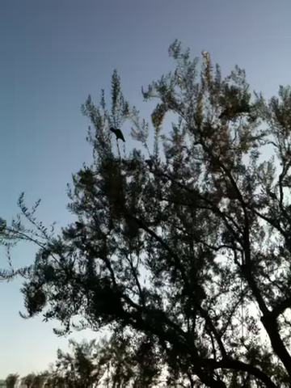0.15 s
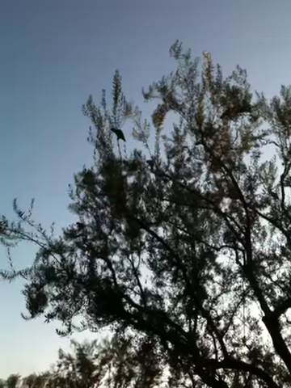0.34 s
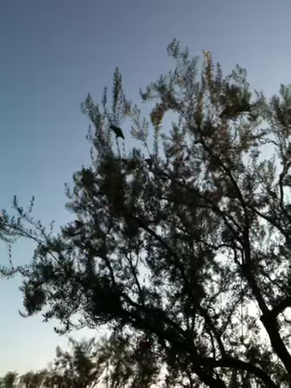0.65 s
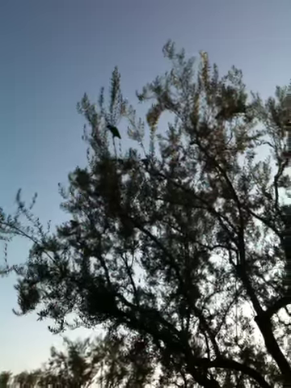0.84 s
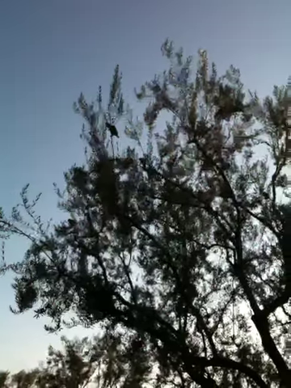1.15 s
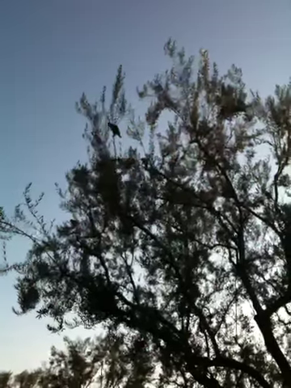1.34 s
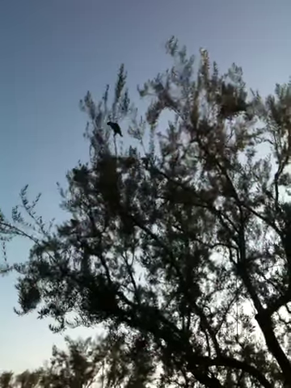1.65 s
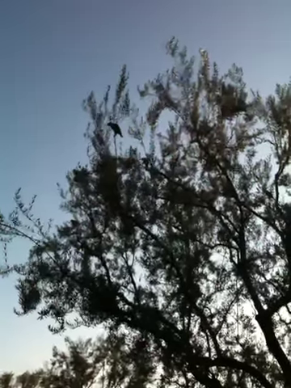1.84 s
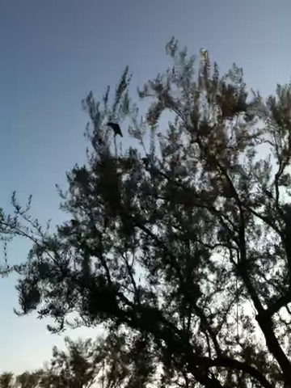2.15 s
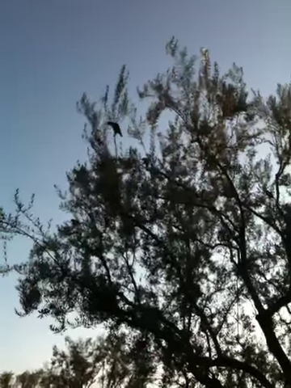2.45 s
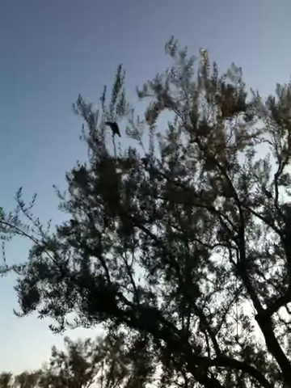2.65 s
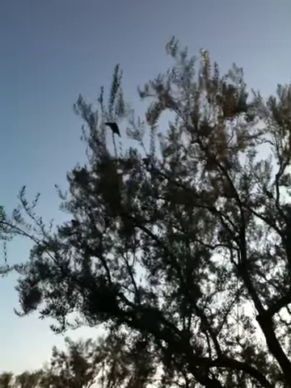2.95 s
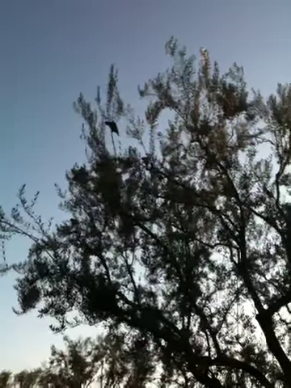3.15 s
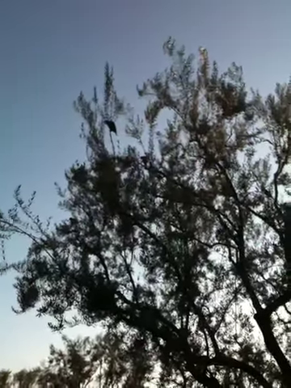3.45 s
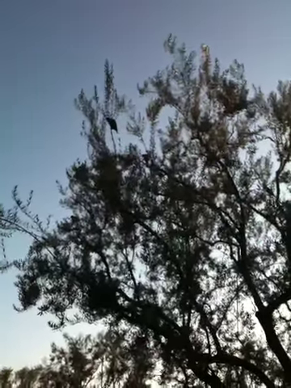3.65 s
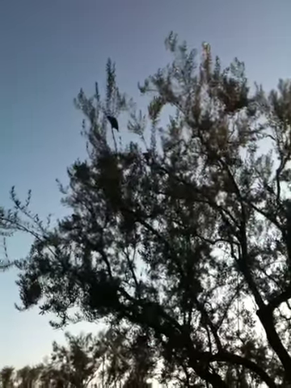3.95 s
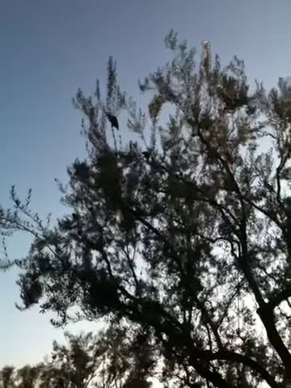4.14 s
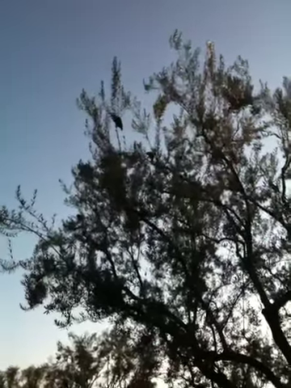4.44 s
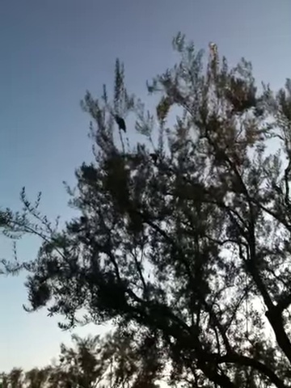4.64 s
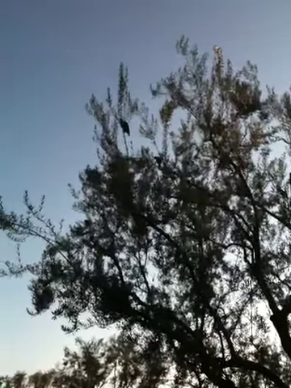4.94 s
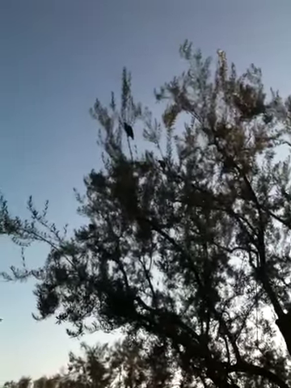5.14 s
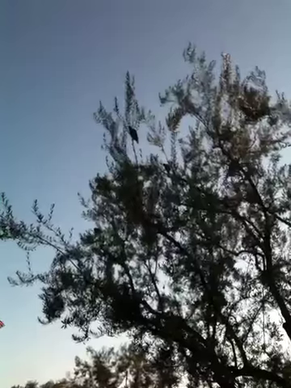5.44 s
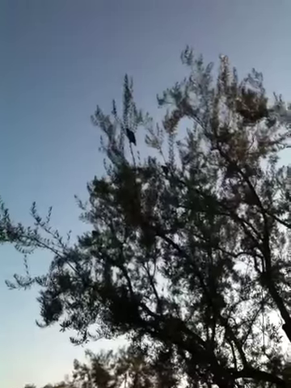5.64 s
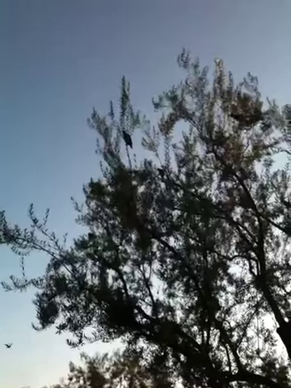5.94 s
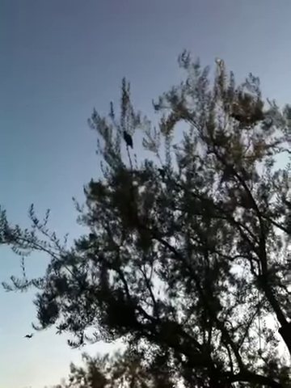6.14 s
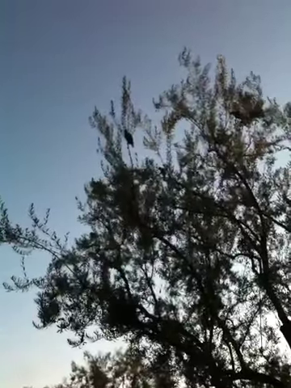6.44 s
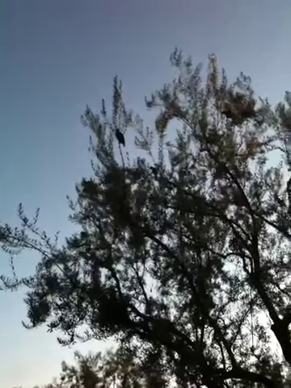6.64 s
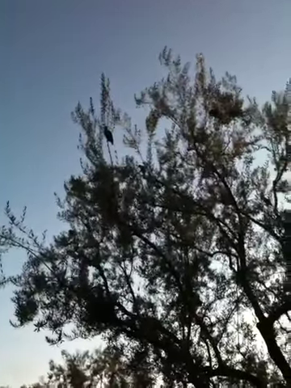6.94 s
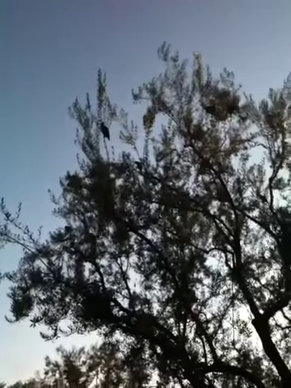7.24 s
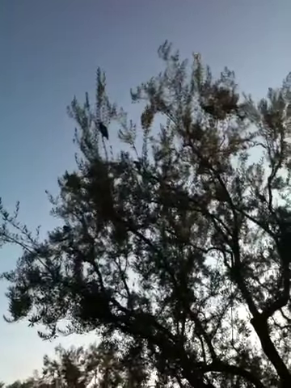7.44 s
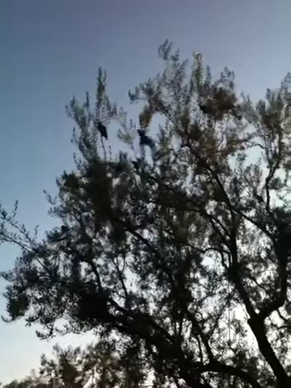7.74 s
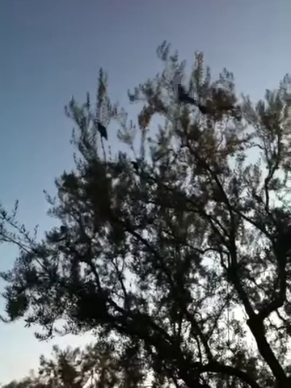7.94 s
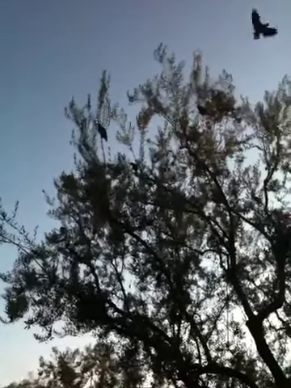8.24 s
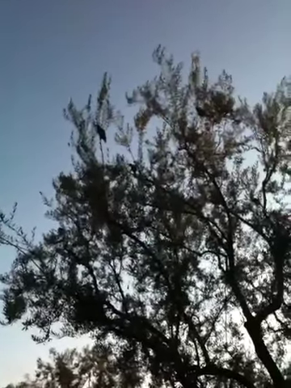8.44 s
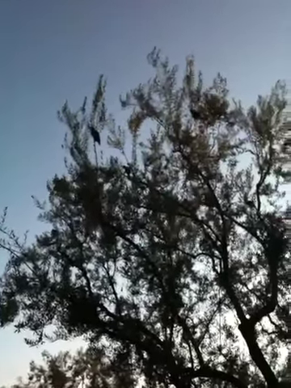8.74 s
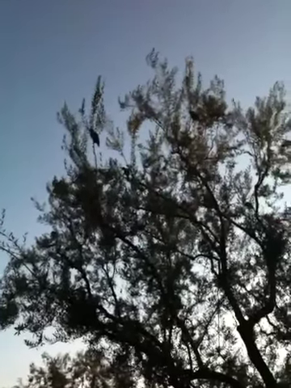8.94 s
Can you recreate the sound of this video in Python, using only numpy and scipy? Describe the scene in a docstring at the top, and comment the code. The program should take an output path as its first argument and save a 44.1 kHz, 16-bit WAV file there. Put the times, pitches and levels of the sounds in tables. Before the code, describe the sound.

After a tiny silence, a raspy descending screech bursts in at 0.1 s with short falling whistles, then a fading squawk to 0.5. Nasal yelps and gritty squawks fill 0.7-1.7, followed by quiet chirps and a sharp broken screech at 2.4-2.6. Soft low thumps and rumble from the hand-held microphone cluster around 2.7-3.3, 3.9-4.2 and 5.4. Squawks lead to fierce screeches at 4.1-4.3 and 4.7-5.0, more squawks at 5.3-5.5, then low caws around 5.6 and 6.1 in a sparse lull. Screeching returns at 6.8-7.0 and builds from 7.3 to the loudest calls at 7.6-8.2, shrill, sliding downward and cracking into low buzzing scoops. A duller rasp at 8.3, faint chirps to 8.8 and a swelling caw with a bump at 9.0 close it. Distant chatter, faint hum and airy foliage echo lie behind.

```python
"""Parrots squabbling in a tree at dusk

A flock whistles close by; a slow oscillator in each voice splits the notes into subharmonics and harsh rasps.
More birds chatter farther off as short falling notes; a nasal one yelps and a lower-voiced one caws.
Weak early copies give the answer of ground and limbs, a scattered noise tail that of the trees.
The hand-held camera's microphone picks up soft, decaying bumps and a rumble over a faint outdoor hum
of coloured noise."""
import sys
import numpy as np
from scipy import signal
from scipy.fft import rfft, irfft, next_fast_len
from scipy.io import wavfile
from scipy.ndimage import uniform_filter1d, map_coordinates

SR = 44100
rng = np.random.default_rng(int(sys.argv[2]) if len(sys.argv) > 2 else 0)


def inscribe(sig):
    """Save sig as 16-bit PCM at rate SR to the path in sys.argv[1].

    A 1-D sig is mono; a 2-D sig holds one channel per row.
    Samples are clipped to [-1, 1] before scaling.
    """
    pcm = np.round(np.clip(np.atleast_2d(sig).T, -1, 1) * 32767)
    wavfile.write(sys.argv[1], SR, pcm.astype(np.int16))


N = 401310
START_S = .061  # silence before the microphone opens
TOP_HZ = 15700  # band limit of the microphone
BLEND_S = .008  # one note melts into the next over this time


def amp(db):
    """Decibels to gain."""
    return 10 ** (np.asarray(db) / 20)


def unit(x):
    """Scale to rms 1."""
    return x / np.sqrt(np.mean(x ** 2) + 1e-20)


def along(points, hz):
    """Read (Hz, value) points on a log frequency axis."""
    f, v = np.transpose(points)
    return np.interp(np.log(hz + 1), np.log(f + 1), v)


def curve(rows):
    """One value per sample from (s, value) rows."""
    return np.interp(np.arange(N) / SR, *np.transpose(rows))


def wobble(rate, t):
    """A smooth random curve at times t, rate knots a second."""
    knots = rng.standard_normal(2 ** 9)
    return map_coordinates(knots, [t * rate], mode="wrap")


def colour(x, gain_db):
    """Filter x by a dB function of frequency."""
    m = next_fast_len(len(x) + 2 ** 10)
    gain = amp(gain_db(np.fft.rfftfreq(m, 1 / SR)))
    return irfft(rfft(x, m) * gain, m)[:len(x)]


def noise(spectrum):
    """Steady coloured noise of rms 1."""
    return unit(colour(rng.standard_normal(N), lambda hz: along(spectrum, hz)))


def add(track, s, sound):
    """Mix a sound in at s seconds."""
    i = int(np.clip(round(s * SR), 0, N))
    track[i:i + len(sound)] += sound[:N - i]


def clock(length_s):
    """Time (s) and progress (0-1) through a call."""
    t = np.arange(int((max(length_s, 2 * BLEND_S) + BLEND_S) * SR)) / SR
    return t, t / t[-1]


# Strength of the sidebands when the slow oscillator runs at 1/1 to 1/4 of the pitch: level_db
SIDEBAND_DB = [0, -5.5, -8.5, -11.5]


def syrinx_tone(pitch, slow, rasp, division, centre_hz, throat, top_db, t,
                sub_rasp_db=6, overtone_db=-5.0, pure_db=-8, whistle_db=4.0, whistle_loss_db=3,
                undertone_db=-4, undertone_push=0.049, undertone_per_octave_db=8):
    """Whistle harmonics with sidebands set off by the slow oscillator; energy hops between the partials."""
    phase = 2 * np.pi * np.cumsum(pitch) / SR
    # each partial is a harmonic of the whistle or one of its sidebands
    k = np.arange(1, 6 * division + 1)[:, None]
    harmonic = np.maximum(1, (k + division // 2) // division)
    side = k - harmonic * division
    partial_hz = k / division * centre_hz
    offset = rng.uniform(0, 2 * np.pi, 2 ** 6)[:len(k), None]
    partials = np.sin((harmonic * phase + side * slow + offset).astype(np.float32))

    # below this rasp the sidebands fade and the whistle is pure
    pure_rasp = 0.18
    split = np.minimum(1, rasp / pure_rasp)
    sideband_gain = split * amp(SIDEBAND_DB[division - 1] + sub_rasp_db * rasp)
    sidebands = np.where(side, sideband_gain, 1)
    overtones = amp(overtone_db * np.clip(k / division - 1, 0, 1))
    overtones = overtones * np.where(harmonic > 1, amp(pure_db * (1 - split)), 1)

    # shrill notes lean harder on their undertones
    shrill_db = undertone_per_octave_db * np.log2(centre_hz / 2500)
    undertones_db = undertone_db + undertone_push * top_db + shrill_db
    first_db = whistle_db - whistle_loss_db * rasp
    overtones = overtones * amp(first_db * (k == division) + undertones_db * (k < division))

    # quick hops for all partials, slower shifts for all but the whistle itself
    knots = np.arange(2 ** 6) / 170
    hop_db = (1 + 3 * np.interp(knots, t, rasp)) * rng.standard_normal((len(k), len(knots)))
    shift_db = 2.5 * np.array([wobble(40, knots) for _ in k])
    hop_db = hop_db + shift_db * (k != division)
    hops = [np.interp(t, knots, gain) for gain in amp(hop_db)]
    strength = sidebands * overtones * (partial_hz < TOP_HZ) * hops

    # the total that leaves the throat stays even
    radiated = strength * amp(along(throat, partial_hz))
    return np.sum(strength * partials, axis=0) / np.linalg.norm(radiated, axis=0)


def patchy(x, depth_db):
    """Chaos gathers in brief patches, a few hundred hertz wide."""
    z = signal.stft(x, nperseg=256)[2]
    field = uniform_filter1d(rng.standard_normal(z.shape), 3, 0)
    field = uniform_filter1d(field, 3, 1)
    return signal.istft(z * amp(depth_db * unit(field)), nperseg=256)[1][:len(x)]


def note(t, pitch, rasp, division, bright_db, throat, top_db=0,
         jitter=0.0367, jitter_rate=900, flutter_db=1.1, looseness=0.1592,
         turbulence_db=2.2, focus_db=3, focus_octaves=0.44, warble_hiss_db=-3.0):
    """One note of the syrinx: a whistle, modulated by a slower oscillator, that turns chaotic as rasp grows."""
    rasp = np.clip(rasp, 0, 1)
    centre_hz = pitch.mean()
    # tense notes waver; undivided ones warble hardest
    waver_depth = .004 + .032 * rasp + .06 * rasp ** 2 * (division == 1)
    waver = waver_depth * wobble(190, t)
    pitch = pitch * (1 + waver + jitter * rasp * wobble(jitter_rate, t))
    # the slow oscillator only loosely holds its fraction of the pitch
    slip = looseness * rasp * wobble(110, t)
    slow = 2 * np.pi * np.cumsum(pitch / division * (1 + slip)) / SR
    tone = syrinx_tone(pitch, slow, rasp, division, centre_hz, throat, top_db, t)

    # turbulence puffs once in every slow cycle
    hiss = np.resize(rng.standard_normal(2 ** 14), len(t))
    puffs = patchy(hiss, 4) * (1 + .7 * np.cos(slow))

    def beak(hz):
        treble_db = bright_db * along([(3000, 0), (7000, 1)], hz)
        top_octave_db = top_db * along([(8000, 0.031), (13000, 1.0)], hz)
        return along(throat, hz) + treble_db + top_octave_db

    def airy(hz):  # the hiss gathers round the whistle
        octaves = np.log2((hz + 1) / centre_hz)
        return beak(hz) + focus_db * np.exp(-(octaves / focus_octaves) ** 2)

    hoarse = amp(turbulence_db + warble_hiss_db * (division == 1)) * rasp ** 2
    voice = unit(colour(tone, beak)) + hoarse * unit(colour(puffs, airy))
    voice = voice / np.hypot(1, hoarse)
    gate = np.sin(np.pi / 2 * np.clip(np.minimum(t, t[-1] - t) / BLEND_S, 0, 1))
    flutter = unit(amp(flutter_db * (0.98 + rasp) * wobble(137.4, t)))
    return voice * gate * flutter


# Spectrum of the outdoor hum at the microphone: freq_hz, level_db
AIR_SPECTRUM = [(15, -82), (25, -78), (59, -19), (221, -1.5), (281, -7.5), (349, -9.5), (741, -10),
                (997, -10), (1530, -12), (2360, -29), (2770, -28), (3090, -27), (4040, -35), (4380, -25),
                (15500, -40.5)]


def evening_air():
    """A faint, low-heavy hum of coloured noise whose level drifts slowly."""
    drift_db = wobble(1.703, np.arange(N) / SR)
    return noise(AIR_SPECTRUM) * amp(-55.0 + drift_db)


# How long the trees ring in each band: freq_hz, t60_s
GROVE_DECAY = [(300, 0.28), (2500, 0.66), (6000, 0.96), (14000, 0.63)]


def grove(x, scatter_rate=420):
    """Diffuse answer of the trees: foliage smears the pitch, and each band dies at its own speed."""
    hz, t, z = signal.stft(rng.standard_normal(SR), SR, nperseg=256)
    decay = amp(-60 * t / along(GROVE_DECAY, hz)[:, None])
    tail = signal.istft(z * decay, SR, nperseg=256)[1]
    scattered = x * unit(wobble(scatter_rate, np.arange(N) / SR))
    delayed = np.pad(tail, (SR // 80, 0)) / np.linalg.norm(tail)
    return signal.fftconvolve(scattered, delayed)[:N]


# Chatter from the far birds, before a 3 dB cut: time_s, level_db
FLOCK_LEVEL = [(0, -36), (.45, -44), (.6, -54.5), (.9, -43.5), (1.3, -49.5), (1.7, -49.5), (2.1, -57),
               (2.7, -52), (3.1, -54), (3.9, -49), (4.35, -45), (5.05, -44.5), (5.2, -55), (5.6, -55),
               (5.9, -63.5), (6.3, -53), (6.6, -60), (7.4, -47.5), (8.4, -61), (8.85, -63.5), (9.1, -46.5)]
# Throat resonance shared by the far birds and most of the near ones: freq_hz, gain_db
THROAT_SPECTRUM = [(400, -22), (800, -11.5), (1300, -2.5), (1800, 1.5), (2400, -0.5), (3200, 2), (4400, -1),
                   (5600, -5.5), (7500, -6.5), (9000, -15.5), (10500, -23), (15500, -38.5)]
# Colour that the distance gives the far birds: freq_hz, gain_db
DISTANCE_SPECTRUM = [(600, 9.5), (2000, -2.5), (5000, -1), (9000, 1.5), (15000, -5)]


def far_flock(count=190):
    """Many distant birds with short, hoarse, falling notes, dulled by the air."""
    out = np.zeros(N)
    for i, draws in enumerate(rng.random((count, 8))):
        when, length, pitch, fall, bend, kind, rasp, size = draws
        t, u = clock(.03 + .05 * length)
        arc = 1 + .25 * (bend - .5) * np.sin(np.pi * u)
        hz = (2000 + 1300 * pitch) * (1 - .28 * fall * u) * arc
        hoarse = np.full(len(t), .25 + .55 * rasp)
        sound = note(t, hz, hoarse, 2 + int(2 * kind), 0, THROAT_SPECTRUM)
        add(out, (i + when) / count * N / SR, amp(7.3 * size) * sound)
    out = out + amp(0.3) * grove(out)
    out = colour(out, lambda hz: along(DISTANCE_SPECTRUM, hz))
    return unit(out) * amp(curve(FLOCK_LEVEL) - 3.0)


# Rumble of the grip on the camera, before a 0.5 dB cut and random unsteadiness: time_s, level_db
GRIP_LEVEL = [(0.2, -60), (0.25, -64.5), (0.62, -58.5), (2.65, -54), (2.88, -39.5), (3.12, -45), (3.3, -50),
              (3.57, -52.5), (3.82, -50), (4.04, -44.5), (4.19, -52.5), (4.64, -51.5), (4.98, -49.5),
              (5.28, -52), (5.38, -40), (5.6, -57), (6.35, -58), (8.03, -53), (8.43, -48.5), (8.55, -50),
              (8.78, -53.5), (9.1, -45)]


def slips(count=200, scatter_db=8):
    """Small bumps at random, stronger while the grip rumbles: rows (s, peak dB, pitch Hz)."""
    firm_grip_db, slip_db = -47.5, -39.5  # rumble level from which slips peak, on average, at slip_db
    fade_ratio = 2.22  # slips fade faster than the rumble
    when, size, pitch = rng.random((count, 3)).T
    s = (np.arange(count) + when) / count * N / SR
    calm_db = np.minimum(0, np.interp(s, *np.transpose(GRIP_LEVEL)) - firm_grip_db)
    peak_db = slip_db + fade_ratio * calm_db + scatter_db * (size - .5)
    return list(zip(s, peak_db, 160 + 80 * pitch))


# The firmest handling bumps, before the casing colours them: start_s, peak_db, pitch_hz
FIRM_BUMPS = [(2.033, -32, 209), (2.713, -25, 185), (2.758, -32.5, 164), (2.861, -23.5, 307),
              (2.886, -24.5, 215), (2.98, -29, 228), (3.053, -31, 197), (3.071, -30, 184),
              (3.107, -32, 172), (3.235, -34, 258), (3.272, -33.5, 163), (3.312, -34, 149),
              (3.504, -34.5, 179), (3.857, -39, 213), (3.901, -30.5, 195), (3.922, -33, 227),
              (3.942, -33.5, 183), (4.1, -29.5, 236), (4.116, -29, 210), (4.132, -29, 220),
              (4.152, -33, 178), (4.391, -33.5, 230), (4.547, -31.5, 228), (4.634, -35.5, 230),
              (4.731, -35.5, 174), (4.86, -29.5, 184), (5.194, -32, 253), (5.243, -33, 199),
              (5.259, -37, 257), (5.276, -31, 198), (5.305, -31.5, 232), (5.348, -34, 265),
              (5.362, -25, 194), (5.374, -30, 275), (5.384, -34, 230), (5.397, -28, 200),
              (5.434, -28.5, 220), (7.811, -37.5, 202), (8.192, -34.5, 221), (8.347, -37.5, 192),
              (8.569, -33.5, 181), (9.07, -24.5, 250), (9.083, -28.5, 267)]
# Spectrum of the grip's rumble in the microphone: freq_hz, level_db
RUMBLE_SPECTRUM = [(18, -71), (30, -78), (94, -1), (156, 5), (200, 1), (328, -5), (408, -13), (501, -14),
                   (800, -22.5), (1040, -83), (1760, -120)]


def handling(rise_s=0.0019):
    """Each shift of the grip gives the casing a dull push of two or three cycles, over a rumble."""
    out, t = np.zeros(N), np.arange(SR // 16) / SR
    shape = (t / (2 * rise_s)) ** 2 * np.exp(2 - t / rise_s)
    bumps = list(FIRM_BUMPS) + slips()
    for (s, db, hz), turn in zip(bumps, rng.random(len(bumps))):
        push = shape * np.sin(2 * np.pi * (hz * t + turn))
        add(out, s - 2 * rise_s, amp(db) * push)
    casing = [(30, -28), (70, 0.0), (130, 9.5), (280, 3.0),
              (420, 11.5), (800, 18.0), (1600, -20), (4000, -50)]  # (Hz, dB)
    unsteady_db = 2.5 * wobble(25, np.arange(N) / SR)
    rumble = noise(RUMBLE_SPECTRUM) * amp(curve(GRIP_LEVEL) - 0.5 + unsteady_db)
    return colour(out, lambda hz: along(casing, hz)) + rumble


def sweeps(t, depth, sweep_s=0.025):
    """Pitch factor of a run of quick downward sweeps that deepen towards the end of a call."""
    left = t[-1] - t - BLEND_S / 2
    sawtooth = np.maximum(left, 0) / sweep_s % 1 - .5
    return 1 + depth * (t / t[-1]) ** 2 * sawtooth


def top_octave(db, ordinary_db=-39, nearness=0.69):
    """Loud, near birds keep more of their top octave (dB)."""
    return nearness * (db - ordinary_db)


def voiced(t, pitch, rasp, division, bright_db, opening_db, throat, db):
    """One call: its effort surges at random, and the opening beak changes the treble."""
    surge_rate = 36  # knots per second
    surge_db, surge_rasp, surge_pitch = 0.57, 0.099, 0.01957  # level; shares of rasp and pitch
    surge = wobble(surge_rate, t)
    pitch = pitch * (1 + surge_pitch * rasp * wobble(surge_rate, t))
    rasp = rasp * (1 - surge_rasp * surge)
    sound = note(t, pitch, rasp, division, bright_db, throat, top_octave(db))
    treble_band = [(2500, -35), (4000, -4.0), (6000, -4), (8500, -1.5), (12000, -3)]  # (Hz, dB)
    treble = colour(sound, lambda hz: along(treble_band, hz))
    opened = sound + treble * (amp(opening_db * (t / t[-1] - .5)) - 1)
    return opened * unit(amp(surge_db * surge))


def with_beak(resonances, width_octaves=0.17):
    """The throat spectrum plus the peaks and dips of one bird's open beak: (Hz, dB)."""
    hz = np.geomspace(400, 15500, 2 ** 7)
    beak_db = sum(db * np.exp(-(np.log2(hz / centre_hz) / width_octaves) ** 2) for centre_hz, db in resonances)
    return np.column_stack([hz, along(THROAT_SPECTRUM, hz) + beak_db])


# Long screeches close to the microphone: division (of the pitch), sweep_depth (share of pitch), bright_db,
# opening_db (treble control from start to end), beak (rows of freq_hz, gain_db),
# course (rows of time_s, pitch_hz, rasp 0-1, level_db before the mix)
SCREECH_CALLS = [ (3, 0.1, 2, -5, [(1600, 3.5), (2250, 2.5), (2900, -2), (5500, -4.5)],
                 [(.055, 2380, 0.64, -41), (.12, 2340, 0.59, -35), (.16, 2359, 0.42, -33.5),
                 (.2, 2250, 0.72, -37), (.245, 2104, .55, -41.5), (.31, 1970, 0.9, -44)]),
                 (2, 0.036, 6.5, 4, [(1900, 4), (4100, 2.5), (5500, -3)], [(2.368, 2498, 0.52, -60),
                 (2.384, 2554, .7, -47), (2.392, 2290, 1, -44), (2.405, 2797, 0.4, -39),
                 (2.414, 2826, 0.63, -35), (2.422, 2490, 0.94, -43.5), (2.437, 2596, 0.6, -38.5),
                 (2.452, 2530, 0.9, -41), (2.463, 2400, .85, -38.5), (2.478, 2110, 1, -44),
                 (2.495, 2200, 0.6, -45), (2.506, 2200, .7, -51)]), (2, 0, 7, 9, [(1400, -3), (4100, 2),
                 (5300, -3), (6700, 2)], [(2.506, 2150, .8, -51), (2.52, 2350, 0.9, -37.5),
                 (2.535, 3205, 0.77, -42), (2.551, 2740, 0.38, -34), (2.565, 3020, 0.63, -41),
                 (2.576, 2550, 0.45, -34), (2.59, 2475, .45, -48.5), (2.615, 2560, .7, -59)]),
                 (2, 0.0082, 1.5, 4, [(2100, 0), (3700, 2.5), (5800, -2.5), (7600, 3.5)],
                 [(4.06, 2725, 0.65, -44), (4.08, 2760, 0.5, -42), (4.091, 2707, 0.08, -29),
                 (4.102, 2980, 0.7, -36), (4.12, 3225, 1, -32), (4.14, 3034, .95, -36),
                 (4.158, 3780, 0.83, -35), (4.167, 2610, 0.44, -32.5), (4.175, 2540, 0, -30.5),
                 (4.186, 2520, 0.83, -37), (4.198, 2350, 0.43, -36), (4.218, 2560, 0.5, -34)]),
                 (4, 0, 3.5, 9, [(1650, 2.5), (3800, -0.5), (5400, -6.5), (7300, 5)],
                 [(4.215, 2380, 0.8, -31.5), (4.233, 2490, 0.8, -30.5), (4.245, 3400, .75, -31.5),
                 (4.262, 2960, 0.22, -31), (4.272, 3095, 0.78, -36), (4.281, 2870, 0.43, -30.5),
                 (4.289, 2520, .4, -32), (4.302, 2520, .7, -47)]), (2, 0.33, 4.5, 35, [(2300, 0.5),
                 (3700, 4), (4700, 5)], [(4.66, 2298, .8, -48.5), (4.74, 2460, .85, -34.5),
                 (4.79, 2746, 0.88, -33.5), (4.845, 3100, 0.7, -33), (4.87, 2870, 0.28, -31.5),
                 (4.925, 2596, .55, -40.5), (4.95, 2806, .25, -42), (4.975, 2620, 0.24, -38.5),
                 (4.995, 2273, .6, -72)]), (2, 0.044, 2, -5, [(1400, -10), (4500, 5.5), (6300, -3)],
                 [(6.757, 2530, 0.76, -46), (6.769, 2790, .55, -36.5), (6.785, 2527, .36, -41),
                 (6.798, 2483, .6, -42), (6.81, 2674, 0.72, -41), (6.82, 2447, 0.7, -40),
                 (6.835, 2690, 0.87, -38.5), (6.853, 2420, 0.8, -35.5), (6.868, 2760, 0.6, -42),
                 (6.882, 2360, .8, -45), (6.892, 2560, 0.65, -36), (6.903, 2470, 0.44, -36),
                 (6.918, 2520, 0.04, -36), (6.932, 2420, 0.4, -47)]), (3, 0, 3, 1, [(800, 8.5), (1650, -5),
                 (3600, 3), (4700, 2.5), (8200, 7)], [(6.938, 2380, .4, -44), (6.951, 2485, .48, -29.5),
                 (6.968, 2340, 0.77, -34.5), (6.982, 2410, 0.6, -38), (6.995, 2334, 0.73, -35),
                 (7.005, 2372, .4, -28), (7.024, 2397, 0.08, -26), (7.033, 2370, .35, -38),
                 (7.042, 2400, .5, -53)]), (2, 0, 4, 4.5, [(1600, -8), (2300, 2), (3700, 0), (4700, 6),
                 (7100, 2)], [(7.28, 2670, .8, -54), (7.365, 2767, 0.92, -36.5), (7.42, 2754, .9, -31.5),
                 (7.46, 2610, 0.83, -33.5), (7.482, 2950, 0.47, -33.5), (7.505, 2780, 0.52, -30.5),
                 (7.525, 2743, 0.16, -30), (7.545, 2566, 0.57, -29), (7.563, 2540, 0.7, -48.5)]),
                 (3, 0.013, 2.5, -5, [(1500, 3), (3900, 6), (5900, 2.5)], [(7.577, 2484, 0.68, -38),
                 (7.597, 2250, 0.69, -31.5), (7.635, 2258, 0.82, -36), (7.65, 2413, 0.51, -27),
                 (7.705, 2370, 0.02, -21.5), (7.72, 2360, 0.26, -31), (7.74, 2340, .5, -31),
                 (7.765, 2197, 0.01, -26.5), (7.795, 2145, 0.35, -31), (7.824, 2034, 0, -30),
                 (7.833, 2054, .15, -34.5), (7.846, 2000, 0, -28), (7.866, 1970, .05, -54)]),
                 (2, 0.039, -1.5, -5, [(1250, 1.5), (1650, -11), (2500, -1), (5100, 7)],
                 [(7.895, 2650, 0.43, -45), (7.904, 2684, 0.6, -39), (7.915, 2683, .7, -37.5),
                 (7.94, 2720, 0.67, -32.5), (7.965, 2640, 0.55, -31), (7.985, 2620, .7, -42)]),
                 (3, 0.029, 2.5, -4, [(1350, 5.5), (1700, -4), (3000, -4), (4500, 4.5), (6600, -11),
                 (8800, 2.5)], [(7.962, 2388, .5, -33), (8, 2068, .6, -30), (8.028, 2170, 0.5, -31.5),
                 (8.047, 2067, 0.32, -26.5), (8.073, 2303, 0.6, -27), (8.09, 2218, 0.48, -29),
                 (8.115, 2197, 0.43, -30), (8.135, 2020, 0.8, -33), (8.16, 1930, 0.41, -33.5),
                 (8.195, 1915, 1, -37.5), (8.212, 1800, 0.2, -46), (8.235, 1733, 0.36, -51)]),
                 (4, .05, -9.5, -10, [(1200, 7), (1800, -1.5), (2900, -8), (3800, 0.5), (5400, 4),
                 (7300, -6)], [(8.266, 1797, 0.46, -58.5), (8.295, 1858, .75, -34.5),
                 (8.315, 1924, .72, -35), (8.355, 1902, .68, -35.5), (8.37, 1754, 0.6, -52),
                 (8.385, 1760, .4, -59)])]


def screeches():
    """Long calls of the nearest birds; during a break the whistle weakens and its rasp is drawn to one value."""
    break_rasp, break_duck_db = 0.62, -6  # reached in the middle of a break
    out = np.zeros(N)
    for division, depth, bright_db, opening_db, beak, course in SCREECH_CALLS:
        s, *controls = np.transpose(course)
        t, _ = clock(s[-1] - s[0])
        now = s[0] - BLEND_S / 2 + t
        pitch, rasp, db = [np.interp(now, s, c) for c in controls]
        broken = 0
        for start, length, *_ in VOICE_BREAKS:
            broken = broken + np.sin(np.pi * np.clip((now - start) / length, 0, 1)) ** 2
        rasp = rasp + (break_rasp - rasp) * broken
        pitch = pitch * sweeps(t, depth)
        sound = voiced(t, pitch, rasp, division, bright_db, opening_db, with_beak(beak), db.mean())
        add(out, now[0], amp(db + break_duck_db * broken) * sound)
    return out


def near_echoes(x, count=8):
    """Weak early copies from the ground and the limbs, 2 to 20 ms late."""
    out = np.zeros(N)
    for delay, size in rng.random((count, 2)):
        add(out, .002 + .018 * delay, (2 * size - 1) * x)
    return out


# Arched or plunging whistles near the microphone: start_s, end_s, first_hz, middle_hz, last_hz,
# rasp (0-1), level_db (before the mix), bright_db
CHIRP_NOTES = [(0.162, 0.207, 2400, 2100, 1860, 0.4, -43.5, -8),
               (.208, 0.235, 4450, 4320, 4280, 0.2, -47, -8),
               (0.234, 0.268, 2160, 1710, 1330, 0, -43.5, -13),
               (0.267, 0.31, 2083, 2015, 1970, 0.1, -42, -14),
               (0.326, 0.361, 2190, 2450, 2250, 0.43, -48, -3),
               (0.379, 0.413, 2590, 2110, 1580, 0.37, -50.5, -6),
               (0.416, 0.459, 2370, 2330, 2270, .25, -45.5, -5), (.66, .7, 5500, 5650, 5560, 0, -62, -5),
               (1.548, 1.59, 4740, 4280, 3800, .3, -58, -5),
               (1.76, 1.8, 3450, 3320, 3020, 0.15, -57.5, -11),
               (1.836, 1.888, 5050, 4900, 4700, .15, -69, -8),
               (1.864, 1.915, 3150, 2890, 2680, 0.24, -59.5, -11),
               (1.833, 1.9, 2525, 2420, 2330, 0.4, -58, -17), (1.907, 1.94, 4850, 4330, 3850, .15, -66, -5),
               (1.923, 1.976, 2154, 2070, 1960, 0.64, -55, 0),
               (1.969, 2.006, 3700, 2890, 2600, 0.2, -57, 0),
               (1.971, 1.998, 5200, 4530, 4100, 0.3, -64, -3),
               (1.98, 2.008, 2010, 2120, 1940, 0.1, -53, -15),
               (2.026, 2.064, 2120, 1790, 1950, 0.25, -55, -28),
               (2.076, 2.116, 2020, 2100, 1880, 0.3, -53, -28),
               (2.711, 2.76, 1950, 2000, 1840, 0.6, -54, -25),
               (2.83, 2.877, 2630, 2620, 2620, 0.16, -54, -8),
               (3.535, 3.578, 2510, 3360, 3200, 0.5, -52, 12),
               (3.543, 3.59, 4260, 4650, 4500, 0.3, -53, -6),
               (3.582, 3.621, 2820, 2490, 2570, .58, -45, 8.5),
               (3.702, 3.736, 2500, 2540, 2400, 0.34, -47, 9), (3.874, 3.92, 1910, 1920, 1850, 0, -57, -19),
               (4.308, 4.356, 2006, 1820, 1960, .35, -57, -7),
               (4.355, 4.389, 1960, 1844, 1960, 0.17, -56, -5), (4.4, 4.43, 2010, 1830, 1970, 0.2, -56, -4),
               (4.442, 4.48, 1880, 1800, 2030, 0.46, -52.5, -12),
               (4.5, 4.55, 1824, 2020, 2050, 0.7, -51.5, -10),
               (4.561, 4.595, 2500, 2200, 2120, .2, -49, -12),
               (6.674, 6.73, 2960, 2940, 2870, 0.27, -52.5, 2),
               (7.161, 7.215, 2940, 2434, 2300, 0.2, -47, 2), (8.615, 8.654, 1850, 2070, 1980, 0.7, -56, 1),
               (8.663, 8.707, 1890, 2050, 1950, 0.45, -58, -16),
               (8.718, 8.785, 2050, 1990, 1890, .45, -57, -22)]


def chirps(edge_s=0.0038):
    """Short whistles, some raspy, whose pitch bends in one arc."""
    out = np.zeros(N)
    for start, end, first_hz, middle_hz, last_hz, rasp, db, bright_db in CHIRP_NOTES:
        t, u = clock(end - start)
        arc_hz = middle_hz - (first_hz + last_hz) / 2
        pitch = first_hz + (last_hz - first_hz) * u + arc_hz * np.sin(np.pi * u)
        envelope = unit(np.minimum(1, np.minimum(t, t[-1] - t) / edge_s))
        sound = note(t, pitch, np.full(len(t), rasp), 1, bright_db, THROAT_SPECTRUM)
        add(out, start - BLEND_S / 2, amp(db) * envelope * sound)
    return out


def short_calls(rows, throat):
    """Short calls: the pitch glides, the level swells or sinks, the rasp eases off at the end."""
    attack_s, release_s = 0.015, 0.015
    relax = 0.23  # share of its rasp that a call loses towards the end
    opening_db = 4  # treble control as the beak opens
    out = np.zeros(N)
    for start, end, first_hz, last_hz, division, rasp, depth, db, swell_db, bright_db in rows:
        t, u = clock(end - start)
        pitch = (first_hz + (last_hz - first_hz) * u) * sweeps(t, depth)
        edges = np.minimum(1, np.minimum(t / attack_s, (t[-1] - t) / release_s))
        envelope = unit(amp(swell_db * u) * edges)
        eased_rasp = rasp * (1 - relax * u ** 2)
        sound = voiced(t, pitch, eased_rasp, division, bright_db, opening_db, throat, db)
        add(out, start - BLEND_S / 2, amp(db) * envelope * sound)
    return out


# Squawks near the microphone: start_s, end_s, first_hz, last_hz, division (of the pitch), rasp (0-1),
# sweep_depth (share of pitch), level_db (before the mix), swell_db, bright_db
SQUAWK_CALLS = [(.31, .54, 2410, 2300, 3, 0.78, 0.14, -51.5, -10, -6),
                (.915, .975, 2180, 2120, 2, 0.86, 0, -50, 0, -8),
                (.965, 1.04, 2755, 2140, 3, 0.6, 0.19, -46.5, -2, 3),
                (1.16, 1.23, 3415, 2950, 2, .68, 0.052, -44, -10, 7),
                (1.27, 1.46, 2630, 2504, 2, 0.78, 0.23, -47, 7, 1.5),
                (1.455, 1.545, 2517, 2505, 2, 0.58, 0.18, -44, -6, -1),
                (1.54, 1.69, 2510, 2427, 3, 1, 0, -54.5, 14, -7),
                (2.122, 2.19, 3080, 3060, 3, 0.78, 0, -51.5, -3, -2),
                (2.29, 2.325, 2190, 2210, 3, 0.64, 0, -52.5, -10, -10),
                (2.85, 2.94, 2940, 2985, 2, 0.92, 0.12, -50, 4, -3),
                (2.95, 3.05, 3024, 2690, 2, 0.69, 0, -46.5, 0, 1),
                (3.615, 3.688, 2650, 2585, 1, 0.86, 0.0024, -46, -2, 6),
                (3.755, 3.842, 2433, 2407, 3, 0.62, 0.056, -44.5, -3, 3.5),
                (3.93, 4.07, 3155, 3250, 3, 1, 0.079, -50, -2, -4),
                (5.28, 5.41, 2660, 2480, 2, 0.7, 0.17, -44, 7, .5),
                (5.422, 5.47, 2530, 2840, 2, 0.74, 0, -42, -2, -1),
                (5.462, 5.495, 2900, 2400, 2, 0.6, 0, -42, 0, 0.5),
                (5.488, 5.522, 2920, 2330, 2, .4, 0.054, -45.5, -5, 2),
                (6.22, 6.29, 2640, 2700, 3, 0.74, .05, -55, -1, -6),
                (6.3, 6.35, 3450, 3300, 2, 0.63, .05, -57.5, -1, -3),
                (6.36, 6.43, 2600, 2490, 3, 0.6, .05, -55, -9, 0),
                (6.716, 6.76, 2695, 3260, 4, 0.7, 0.025, -46.5, -14, 7),
                (7.04, 7.105, 2820, 2420, 2, 0.55, 0, -45, -9, 0),
                (7.131, 7.178, 2400, 2710, 3, 0.76, 0.063, -43.5, 3, -1),
                (7.455, 7.52, 2395, 2460, 3, 0.37, 0, -38.5, 3, 12)]


def squawks():
    """Short gliding calls through the common throat."""
    return short_calls(SQUAWK_CALLS, THROAT_SPECTRUM)


# Yelps of the nasal bird: columns as for the squawks
YELP_CALLS = [(.695, .765, 1570, 1674, 1, .8, 0, -44.5, 9, 2),
              (.765, .81, 1650, 1595, 1, 0.92, 0.018, -45, -4, -2),
              (.803, .875, 1680, 1600, 1, 0.77, .03, -44.5, -7, 1),
              (.968, 1.06, 1684, 1773, 1, 0.83, .06, -43.5, 0, 1),
              (1.055, 1.115, 1765, 1730, 1, 1, .05, -45.5, -5, 3),
              (1.11, 1.172, 1630, 1730, 1, .8, 0, -42.5, -3, -0.5)]
# Nasal throat resonance: freq_hz, gain_db
NASAL_SPECTRUM = [(400, -24), (1200, -12), (1700, -3.5), (2100, -0.5), (2700, 9), (3400, 6.5), (4100, 4),
                  (4900, -3.5), (5600, -4), (6700, -1), (8200, -7), (10000, -18), (15500, -34)]


def yelps():
    """Nasal calls: the throat favours the second harmonic over the first."""
    return short_calls(YELP_CALLS, NASAL_SPECTRUM)


# Caws of the lower-voiced bird: columns as for the squawks
CAW_CALLS = [(5.52, 5.565, 1243, 1454, 2, 0.4, 0, -57.5, -4, -8),
             (5.57, 5.72, 1400, 1220, 2, 0.7, 0, -61.5, -8, 8),
             (5.98, 6.135, 1470, 1510, 2, .3, 0, -55, 9, -4),
             (6.04, 6.125, 1401, 1532, 2, .8, 0, -53, 10, 2.5),
             (8.95, 9.11, 1417, 1505, 1, 0.7, 0, -50, 17, -6)]
# Throat resonance of the cawing bird: freq_hz, gain_db
CAW_SPECTRUM = [(400, -11), (730, 8.5), (1000, 0), (1500, -9), (2100, -5), (2700, -18), (3500, -3),
                (4200, -20), (4900, -7), (6000, -35), (15000, -29)]


def caws():
    """Lower calls through a throat that favours the low partials."""
    return short_calls(CAW_CALLS, CAW_SPECTRUM)


# Breaks in the loudest screeches, where a lower voice scoops down: start_s, length_s, lowest_hz,
# level_db (before the mix)
VOICE_BREAKS = [(7.649, 0.045, 1172, -34.5), (7.712, 0.048, 841, -31), (7.77, 0.051, 717, -32.5),
                (8.053, 0.033, 760, -37), (8.108, 0.045, 717, -39)]


def second_voice(count=12, tilt_db=-0.02, flicker_db=3):
    """The other side of the syrinx joins in with a buzzy stack of harmonics that dips and rises again."""
    rise = .6  # share by which it starts and ends above its lowest pitch
    out = np.zeros(N)
    for start, length, lowest_hz, db in VOICE_BREAKS:
        t, u = clock(length)
        scoop = 1 + rise * np.abs(2 * u - 1) ** 2.5
        pitch = lowest_hz * scoop * (1 + .018 * wobble(700, t))
        phase = 2 * np.pi * np.cumsum(pitch) / SR
        stack = np.zeros(len(t))
        for n, turn in enumerate(rng.random(count), 1):
            harmonic_db = tilt_db * n + along(THROAT_SPECTRUM, n * pitch) + flicker_db * wobble(134, t)
            stack += amp(harmonic_db) * np.sin(n * phase + 2 * np.pi * turn)
        add(out, start - BLEND_S / 2, amp(db) * unit(stack * np.sin(np.pi * u)))
    return out


def scene():
    """Near birds in their echoes, the far flock, handling and the evening air."""
    near = screeches() + chirps() + squawks() + yelps() + second_voice()
    birds = amp(1.0) * near + amp(5.0) * caws()
    echoes = amp(-12) * near_echoes(birds) + amp(-17) * grove(birds)
    return (birds + echoes + far_flock() + handling() + evening_air())[None]


def record(dry):
    """The camera's microphone opens a moment late and keeps nothing above its band limit."""
    opened = dry[0] * (np.arange(N) > START_S * SR)
    return colour(opened, lambda hz: np.where(hz < TOP_HZ, 0, -120))[None]


dry = scene()
out = record(dry)
inscribe(out)
```